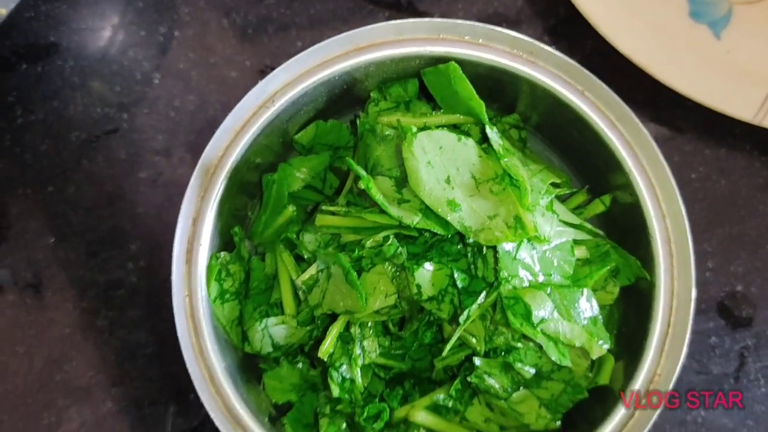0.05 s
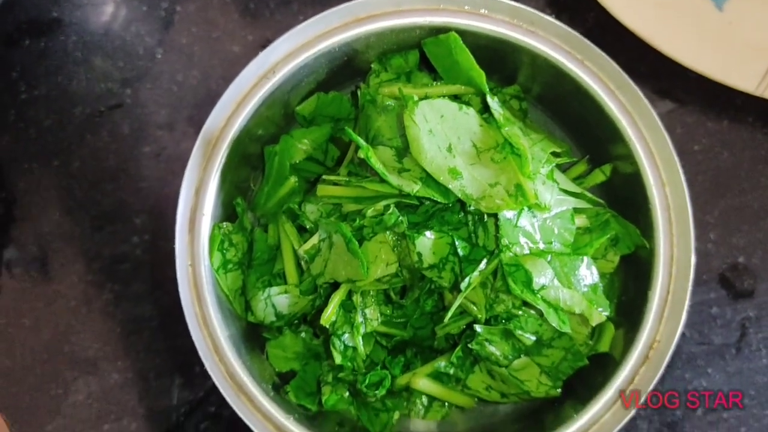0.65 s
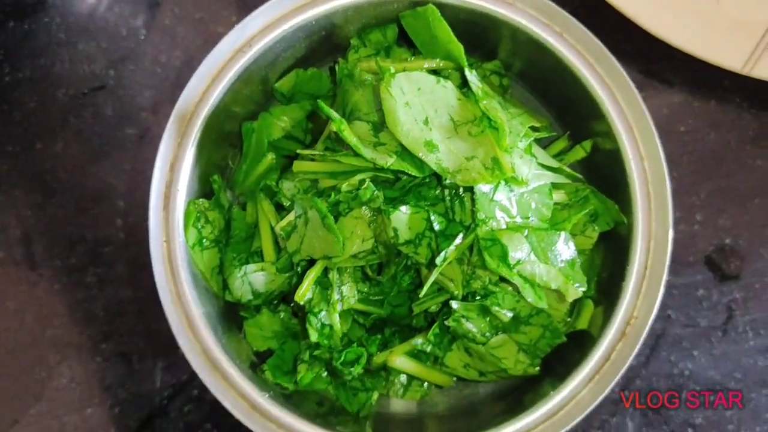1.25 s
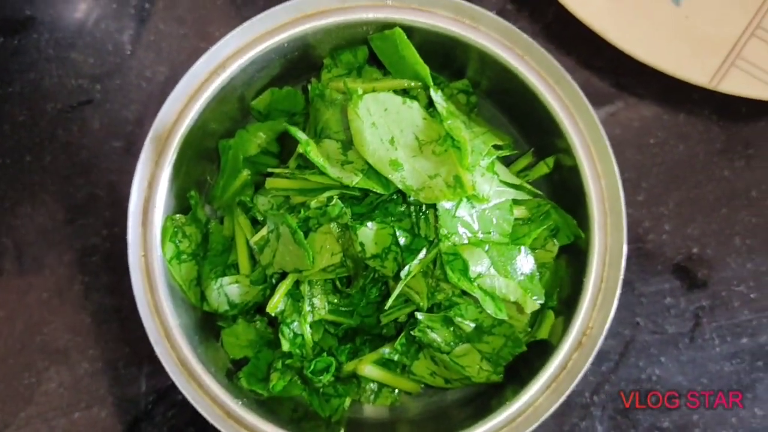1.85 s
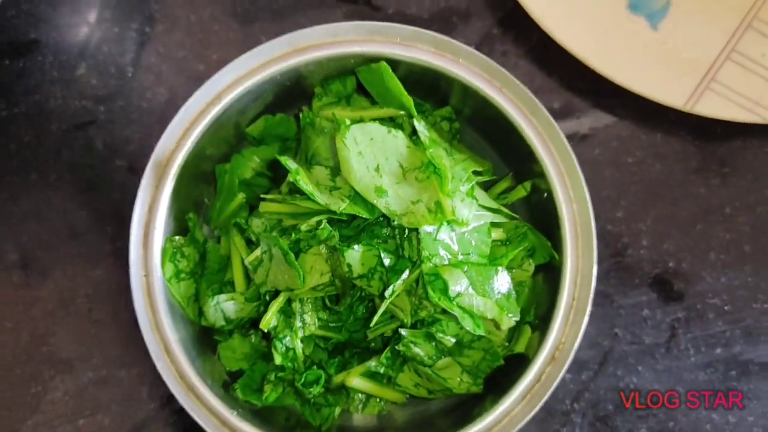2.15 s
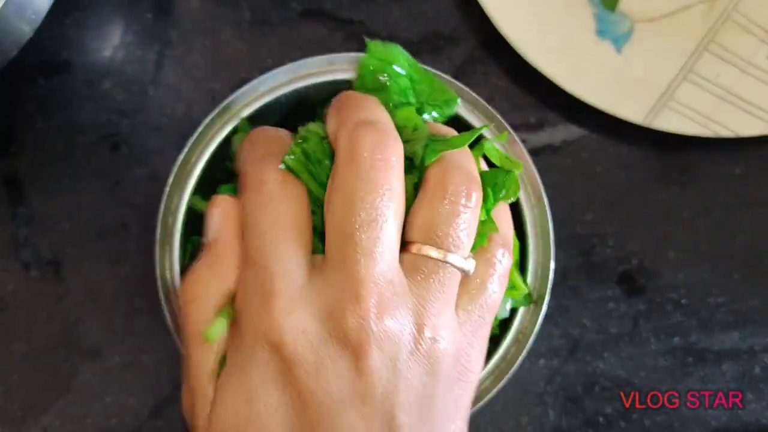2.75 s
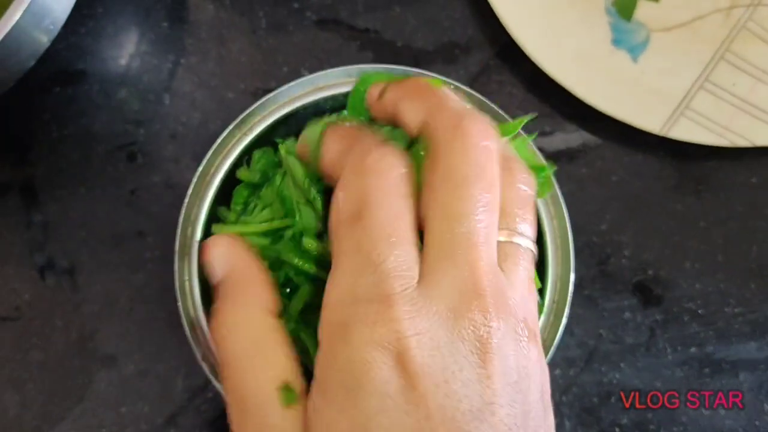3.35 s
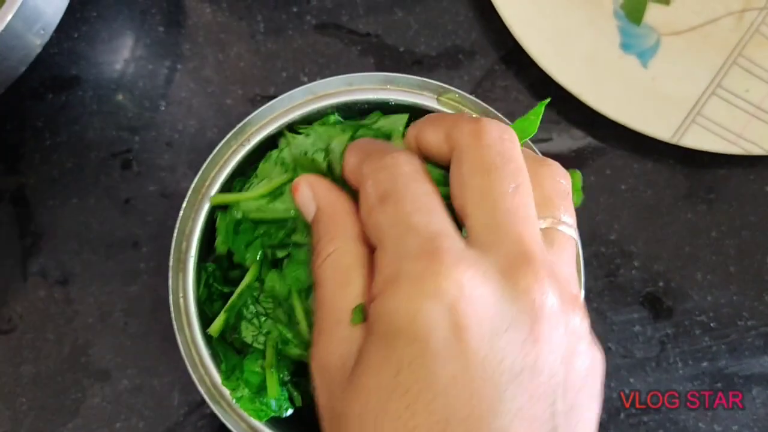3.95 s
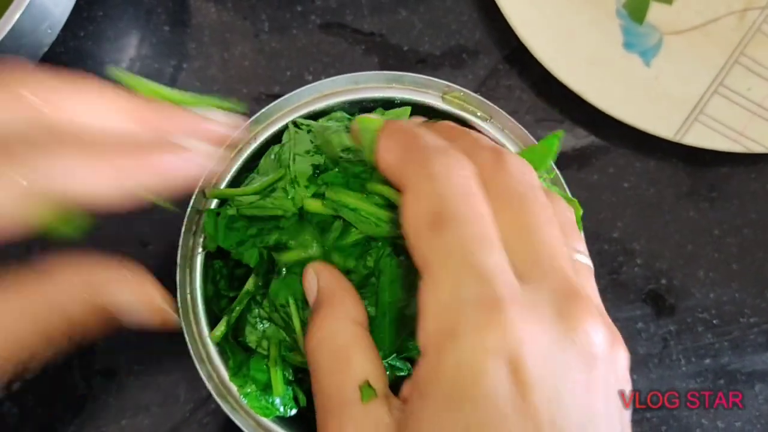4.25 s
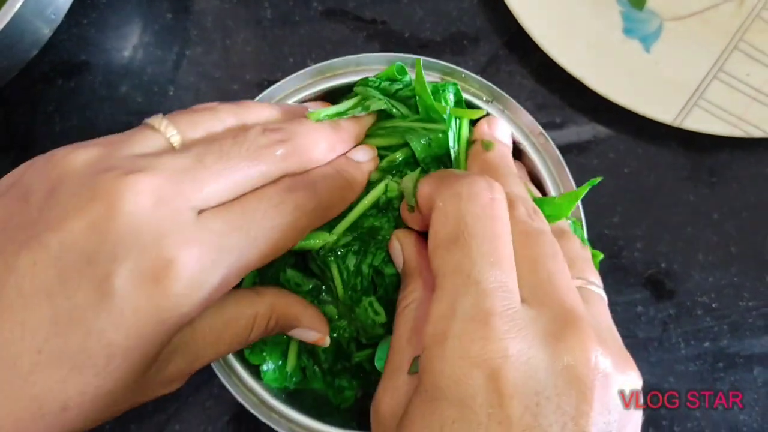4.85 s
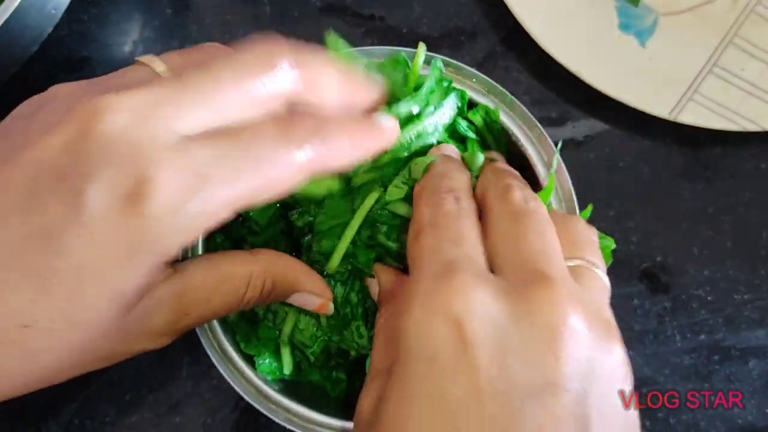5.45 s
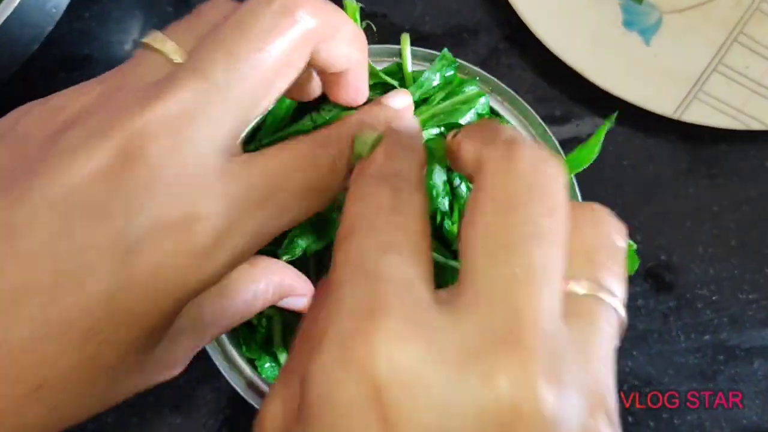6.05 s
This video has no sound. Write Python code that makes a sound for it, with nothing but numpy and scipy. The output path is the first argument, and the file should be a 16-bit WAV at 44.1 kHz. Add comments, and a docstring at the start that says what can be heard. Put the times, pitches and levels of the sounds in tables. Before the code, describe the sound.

Close, wet crackling and dripping of greens squeezed by hand, followed by a soft rustle and light pats in a metal bowl.

```python
"""Wet spinach, wrung out by hand close to a phone's two microphone ports in a small tiled kitchen.
Water films and stalks snap, juice fizzes through the leaves, and drops ring with trapped bubbles.
The leaves then rustle into a steel bowl and are patted down, with faint squeaks and dull knocks.
The tiles echo it all over a low hum; farther off, outside, a bird chirps faintly."""
import sys
import numpy as np
from scipy import signal
from scipy.fft import rfft, irfft
from scipy.io import wavfile
from scipy.ndimage import uniform_filter1d

SR = 44100
rng = np.random.default_rng(int(sys.argv[2]) if len(sys.argv) > 2 else 0)


def inscribe(sig):
    """Save sig as 16-bit PCM at rate SR to the path in sys.argv[1].

    A 1-D sig is mono; a 2-D sig holds one channel per row.
    Samples are clipped to [-1, 1] before scaling.
    """
    pcm = np.round(np.clip(np.atleast_2d(sig).T, -1, 1) * 32767)
    wavfile.write(sys.argv[1], SR, pcm.astype(np.int16))


N = 272979
T = np.arange(N) / SR
FREQS = np.maximum(np.fft.rfftfreq(N, 1 / SR), 1)

# Levels are at the source, ahead of the gains in scene(), the room and the microphone.
# films and stalks snapping: t/s, ping level/dB, f/Hz, then energy against the ping of
# splutter/dB, body/dB, crack/dB, and last splutter decay/s
LEAF_SNAPS = [(.02, -37.5, 7640, -2, 4, -20, .003), (.106, -38, 7400, -1, 8, -20, .003),
              (0.149, -25, 6500, 3, 3, -14, 0.0023), (.169, -38, 8000, -2, -15, -2, .001),
              (0.184, -23, 7000, 5, -2, -20, 0.0029), (.2105, -32, 6600, -5, 8, -20, .003),
              (0.238, -16, 8070, -2, -28, -27, .0015), (.257, -26.5, 5150, -12, -1, -19, .001),
              (0.3805, -29, 7400, 3, -8, -6, .001), (0.398, -35, 7460, -3, -19, -12, .002),
              (0.462, -25.5, 7200, -15, -4, -22, .0012), (.468, -30, 7700, -11, 4, -10, .001),
              (.505, -34, 7400, 3, 4, -6, 0.0044), (0.518, -30, 6960, -8, -7, -2, .002),
              (.549, -28, 7000, -8, -8, -13, .001), (.58, -32, 7000, -3, -10, -20, .002),
              (0.5928, -30, 6750, -8, -11, -15, .001), (0.6344, -28.5, 7400, -2, 4, -15, .001),
              (0.641, -29.5, 7400, -4, 6.5, -9, .005), (0.6853, -24, 7900, 8, -22, 2, .0016),
              (0.734, -32, 7900, 2, -16, -3, 0.0029), (0.8244, -8, 7130, -25, -12, -23, .001),
              (.8433, -39, 7500, -12, -18, -20, .001), (0.8528, -10.5, 7440, -19, -16, -35, 0.00082),
              (.984, -36, 7900, -10, -13, -12, .002), (1.018, -37, 7400, -1, -2, -10, .001),
              (1.03, -35.5, 7000, -14, 4, -13, 0.00092), (1.071, -34, 7600, -10, -16, -12, .002),
              (1.083, -29, 6500, -4, -15, -11, 0.0022), (1.105, -25.5, 6460, -3, -19, -8, 0.0019),
              (1.1215, -28, 7600, 1.5, -4, -10, .003), (1.203, -26.5, 7440, -7, -16, -17, 0.0022),
              (1.349, -36.5, 7540, -4, -6, -20, .002), (1.4649, -38, 7200, -7, 8, -11, .002),
              (1.497, -33, 7800, 6, -4, -9, .002), (1.5212, -5, 7280, -5, -27, -16.5, 0.0014),
              (1.5393, -21, 7700, 1, -25, -22, .002), (1.573, -26, 7340, -7, -5, -20, .001),
              (1.5936, -23.5, 7400, 5, 0.5, -12, 0.00065), (1.6623, -21, 7170, 1.5, -28, -18, 0.003),
              (1.74, -31, 7300, 0, -13, -20, .002), (1.776, -31, 7500, -7, -11, -24, .002),
              (1.8229, -16.5, 7150, -21, -20, -8, 0.0007), (1.9454, -26, 7350, -4, -30, -25, .002),
              (1.95, -21, 7200, -11, -35, -29, 0.0011), (1.995, -29.5, 8450, -5, -19, -16, .002),
              (2.0166, -20.5, 7800, 6.5, -8, -15, .0007), (2.035, -24.5, 6900, -15, 4.5, -5, .002),
              (2.057, -29, 7400, -2, 3, -12, .002), (2.113, -35, 7400, 5, -2, -18, .003),
              (2.18, -33, 7000, 4, -12, -24, .002), (2.2224, -17, 7800, -3, -11.5, -14.5, .0012),
              (2.875, -37, 7600, 5, -15, -20, 0.0054), (2.953, -36.5, 7500, -4, -15, -20, .002),
              (3.082, -38.5, 6700, -6, -8, -20, .002), (3.207, -40.5, 7100, 1, 0, -20, .002),
              (3.43, -40, 7900, -2, 2, -10, 0.0048), (3.9875, -29, 7500, -3, -7.5, -13, .001),
              (4.0481, -26.5, 7400, -14, -20, -13, .001), (4.0722, -27.5, 7550, -4, -16, -19, 0.001),
              (4.775, -37, 7400, -10, -3, -23, .002), (4.895, -27.5, 7240, -2, -28, -29, .002),
              (4.9033, -30, 7300, -10, -25, -32, .002), (4.9104, -33, 7240, -10, -25, -25, .002),
              (5.303, -43, 7300, -6, -15, -20, .002), (5.3665, -42.5, 7500, -7, 1, 0, .002),
              (5.4867, -35, 7500, -16, -8, -16, .002), (5.573, -28.5, 8100, -6, -20, -10, .002),
              (5.588, -30, 7860, -10, -26, -7, 0.0018), (5.617, -35.5, 8400, 0, -17, -1, .002),
              (6.133, -41, 7700, 5.5, -20, -21, 0.0024)]
# drops and air pockets: t/s, level/dB, f/Hz, glide/octaves per 10 ms, relative splash level/dB
DROPS = [(.147, -43, 1720, 0, -8), (.21, -36.5, 2730, .05, -17), (.404, -41, 2130, 0, -12),
         (.461, -42, 1710, .05, -5), (0.504, -38.5, 1840, 0.071, -13), (0.518, -44, 1440, 0.15, 0),
         (.581, -40, 2070, .05, -6), (.603, -42.5, 885, 0.0086, -30), (.743, -43.5, 2230, .026, -17),
         (.71, -50, 1016, 0.011, -12), (.777, -43, 1295, 0, -4), (.814, -39, 2240, .11, -5),
         (0.8504, -22, 2800, 0.33, -15), (0.913, -34, 1920, 0.04, -15), (1.001, -37, 2210, 0.19, -21),
         (1.029, -32.5, 3190, 0.23, -24), (1.251, -35, 2530, 0.13, -11), (1.496, -39.5, 1710, 0.021, -4),
         (1.517, -39, 1700, 0, -4), (1.661, -37, 1700, 0.41, -0.5), (1.7758, -28.5, 1810, 0.0078, -10),
         (1.995, -34, 2450, 0.1, -14), (2.016, -36, 2370, 0.17, 0), (2.035, -27.5, 2194, 0.26, -27),
         (2.06, -35.5, 2410, 0.086, -5), (2.138, -39.5, 2220, 0.03, -17), (5.702, -36.5, 2420, 0.045, -27),
         (5.741, -48, 1327, 0.16, -12)]
# the hand wrings, then pats: t/s, length/s, fizz level/dB, squelch level/dB
HAND_GRIPS = [(0, 0.13, -56, -57), (0.136, 0.092, -48.5, -53), (0.265, 0.061, -51.5, -59.5),
              (0.354, 0.096, -50.5, -56), (0.47, 0.041, -46, -49.5), (0.547, 0.076, -48, -54),
              (0.612, 0.035, -46.5, -53.5), (0.674, 0.1, -53, -56.5), (0.774, 0.16, -59, -59),
              (0.97, 0.086, -59, -63.5), (1.067, 0.09, -55, -57.5), (1.186, 0.13, -65, -61),
              (1.517, 0.14, -54.5, -75), (1.687, 0.076, -54, -63), (1.835, 0.047, -60, -76),
              (2.034, 0.052, -49.5, -58.5), (2.096, 0.13, -53.5, -59.5), (2.228, 0.028, -62, -81),
              (3.116, 0.038, -60.5, -71), (3.767, 0.037, -67, -84), (4.066, 0.026, -62, -72),
              (4.873, 0.035, -63, -69), (5.577, 0.11, -58, -65), (5.645, 0.25, -65, -73)]
# spectra of fizzing juice, squeezed leaves and sliding leaves: f/Hz, level/dB
FIZZ_SPECTRUM = [(1800, -77), (3200, -12), (4800, 0), (5600, -0.5), (7600, 9), (8700, 5.5), (9600, -5.5),
                 (10800, -12.5), (13000, -12.5), (16000, -14.5)]
SQUELCH_SPECTRUM = [(200, -24), (500, -9), (1000, -4.5), (1400, -9.5), (1650, -4.5), (1950, -1.5),
                    (2400, 2), (3000, -3.5), (3900, 0), (5500, -26), (10000, -49)]
RUSTLE_SPECTRUM = [(200, -18), (500, -3), (1000, -3.5), (1800, -2), (2800, 3.5), (3600, -8), (4600, -8),
                   (6000, -10), (7200, 4), (8200, -4.5), (9500, -14), (11000, -24), (16000, -27)]
# fingers and stalks nudge the bowl: t/s, level/dB, f/Hz, width/Hz
BOWL_NUDGES = [(.402, -43.5, 2110, 1500), (.461, -42.5, 258, 450), (0.852, -37, 2100, 3000),
               (4.075, -54, 2300, 2000), (4.103, -59, 1900, 1500), (4.458, -50, 970, 500),
               (5.675, -52, 1900, 2500), (5.699, -51, 1780, 2000), (5.74, -44.5, 1220, 1400),
               (5.762, -50.5, 2300, 3200), (5.776, -53, 1600, 2000)]
# wet skin on stalks and rim: t/s, level/dB, f/Hz, length/s, waver/share of pitch
SKIN_SQUEAKS = [(3.046, -54.5, 4940, 0.0063, .03), (4.206, -64, 5700, 0.095, .07),
                (4.592, -56.5, 8840, .032, 0.03), (4.657, -61, 8600, .021, .025),
                (5.243, -67, 5270, .04, .005), (5.362, -67, 5250, .032, .007),
                (5.366, -64, 8500, .03, .005), (5.365, -65, 3110, 0.11, .003)]
# bird notes, a falling sweep then a held whistle: t/s, level/dB, whistle f/Hz, relative sweep level/dB
BIRD_NOTES = [(3.133, -73, 6480, 2), (3.28, -71, 6450, 1), (3.425, -71, 6280, 0), (3.575, -73.5, 6250, -3),
              (5.988, -71.5, 6480, -1), (6.135, -71, 6400, 0)]
# course of one note: t/s, pitch/ratio to the whistle, amplitude/0-1
NOTE_SHAPE = [(0, .87, 0), (.008, .83, .6), (.026, .69, .5), (.04, .58, .36), (.044, .9, .1),
              (.054, .96, .55), (.064, 1, 1), (.095, 1, .65), (.125, .99, 0)]
# ring time of the tiled room: f/Hz, T60/s
KITCHEN_T60 = [(500, 0.25), (2500, 0.35), (7000, 0.17), (14000, 0.23)]
# spectrum of the room noise: f/Hz, level/dB
AIR_SPECTRUM = [(20, 1.5), (40, -5), (85, -9.5), (125, -18), (170, -11), (300, -16.5), (500, -20.5),
                (900, -21), (2400, -30), (4400, -34), (7400, -30.5), (8800, -36), (9600, -35), (10500, -87),
                (16000, -76)]
# likeness of that noise at the two ports: f/Hz, correlation/0-1
AIR_CORRELATION = [(60, 0.68), (150, 0.95), (300, 0.57), (640, 0.43), (1400, 0.0064), (16000, .01)]
# unsteady bands of the hum: f/Hz, width/Hz, level/dB
HUM_BANDS = [(156.5, 11.4, -67), (197.8, 16.6, -67), (393.5, 8.9, -75.5), (505, 7.5, -77)]
# balance of the microphone ports: f/Hz, left minus right/dB
PORT_BALANCE = [(60, 4.5), (200, 6), (700, 4), (1400, 5), (2100, 8), (2800, 4.5), (4400, -2), (7500, -5),
                (15000, 7)]


def snaps(rise_s=0.00032, body_hz=3200, body_s=0.0049, crack_s=0.00052):
    """Close up, a film tears with a crack and a ping; smaller tears splutter and the leaf ticks."""
    out, t = np.zeros(N), T[:SR // 30]
    swell = (t / rise_s * np.exp(1 - t / rise_s)) ** 4
    for start, db, hz, splutter_db, body_db, crack_db, splutter_s in LEAF_SNAPS:
        noise = rng.standard_normal((3, len(t)))
        ping = swell * np.sin(2 * np.pi * hz * t)
        tears = noise[0] ** 3 * np.exp(-t / splutter_s) * (t > .0005)
        splutter = signal.fftconvolve(tears, ping)[:len(t)]
        body = band(noise[1] * np.exp(-t / body_s), body_hz, 5400)
        crack = resonate(noise[2] * np.exp(-t / crack_s), 10600, 5000)
        parts = [(splutter_db, splutter), (body_db, body), (crack_db, crack)]
        tearing = sum(undb(part_db) * part / np.linalg.norm(part) for part_db, part in parts)
        add(out, start, undb(db) * (ping + np.linalg.norm(ping) * tearing))
    return out


def drips(rise_s=0.00065, splash_s=0.0053):
    """A drop splashes; its trapped bubble rings and rises in pitch as it nears the surface."""
    out, t = np.zeros(N), T[:SR // 8]
    for start, db, hz, glide, splash_db in DROPS:
        t60 = 0.034 * (2000 / hz) ** 2.1  # large bubbles ring longer
        pitch = hz * 2 ** np.minimum(glide * t / .01, .5)
        bubble = np.exp(-np.log(1000) * t / t60) * tone(pitch)
        spray = band(rng.standard_normal(len(t)), 1.3 * hz, 0.81 * hz)
        splash = undb(splash_db) * unit(spray) * np.exp(-t / splash_s)
        add(out, start, undb(db) * (1 - np.exp(-t / rise_s)) * (bubble + splash))
    return out


def fizz(tick_db=-8, tick_hz=6800):
    """Pressed juice bursts tiny films in spurts, each size at its own pitch; larger ones tick."""
    films = sum(resonate(crackle(rate=98, spread_db=2) * spurts(), hz, 1400)
                for hz in np.geomspace(3800, 13500, num=9))
    ticks = resonate(crackle(rate=74, spread_db=4.5), tick_hz, 4500)
    bursts = unit(colour(unit(films) + undb(tick_db) * unit(ticks), FIZZ_SPECTRUM))
    return bursts * juice_flow([row[2] for row in HAND_GRIPS], seep_db=-68.5, floor_db=-74)


def squelch(decay_cycles=4, bubble_count=900):
    """Leaves crackle over each other while small bubbles pop between them."""
    bubbles, t = np.zeros(N), T[:SR // 60]
    for when, smallness, strength in rng.random((bubble_count, 3)):
        hz = 1200 * 3 ** smallness
        pop = np.exp(-t * hz / decay_cycles) * np.sin(2 * np.pi * hz * t * (1 + 6 * t))
        add(bubbles, when * N / SR, undb(10 * strength) * pop)
    leaves = unit(crackle(rate=2000, spread_db=4) * spurts())
    wet_mass = unit(colour(leaves + undb(-5) * unit(bubbles), SQUELCH_SPECTRUM))
    return wet_mass * juice_flow([row[3] for row in HAND_GRIPS], seep_db=-85, floor_db=-75)


def juice_flow(levels_db, seep_db, floor_db, attack_s=0.0036, release_s=0.036, build_db=3):
    """Gain of the flow: each grip sets in, builds and ebbs, over seeping that fades after the wring."""
    wring_end_s, settle_s = 2.48, 0.38
    power = (undb(seep_db) * np.exp(-np.maximum(T - wring_end_s, 0) / settle_s)) ** 2
    t = T[:SR // 2]
    attack = np.minimum(t / attack_s, 1)
    for (start, length, *_), db in zip(HAND_GRIPS, levels_db):
        build = undb(build_db * (np.minimum(t / length, 1) - 2))  # ends build_db below the grip's level
        release = np.exp(-np.maximum(t - length, 0) / release_s)
        add(power, start, (undb(db) * attack * build * release) ** 2)
    return np.hypot(np.sqrt(power), undb(floor_db))


def spurts(rate_hz=55, spread_db=4.5):
    """Gain of a wet layer that gives way in spurts, each of its own strength."""
    hold = int(SR / rate_hz)
    strengths = np.clip(rng.standard_normal(N // hold + 1), -2, 2)
    steps = np.roll(np.repeat(strengths, hold)[:N], rng.integers(N))
    return undb(spread_db * uniform_filter1d(steps, size=hold // 4))


def rustle(start_s=2.406, end_s=2.995, edge_s=0.063, end_db=-54.5, build_db=8):
    """The heap is laid in the bowl: countless slips of leaf on leaf swell until the hand stops."""
    progress = np.clip((T - start_s) / (end_s - start_s), 0, 1)
    contact = np.clip(np.minimum(T - start_s, end_s - T) / edge_s, 0, 1)
    slips = unit(colour(crackle(rate=9000, spread_db=2), RUSTLE_SPECTRUM))
    return slips * contact * undb(end_db + build_db * (progress - 1))


def nudges(decay_s=0.0031):
    """Dull, gritty knocks on the bowl; the wet heap damps the steel at once."""
    out, t = np.zeros(N), T[:SR // 20]
    for start, db, hz, width_hz in BOWL_NUDGES:
        grit = band(rng.standard_normal(len(t)) ** 3, hz, width_hz)
        add(out, start, undb(db) * unit(grit) * np.exp(-t / decay_s))
    return out


def squeaks():
    """A finger slips along a wet stalk or the rim and draws a thin tone, clean or hoarse."""
    out, t = np.zeros(N), T[:SR // 6]
    for start, db, hz, length, waver in SKIN_SQUEAKS:
        pitch = hz * (1 + waver * jitter(len(t), smooth_samples=40))
        envelope = np.sin(np.pi * np.minimum(t / length, 1))
        add(out, start, undb(db) * envelope * unit(tone(pitch)))
    return out


def bird(waver=0.023, rasp=0.14, sweep_s=.044):
    """A thin whistle from outside, hoarse in its fall and nearly steady on the held note."""
    out, t = np.zeros(N), T[:SR // 7]
    when, ratio, amplitude = np.transpose(NOTE_SHAPE)
    course = np.interp(t, when, ratio)
    for start, db, hz, sweep_db in BIRD_NOTES:
        wobble = 1 + (waver + rasp * (1 - course)) * jitter(len(t), smooth_samples=60)
        envelope = np.interp(t, when, amplitude * undb(db + sweep_db * (when < sweep_s)))
        add(out, start, envelope * tone(hz * course * wobble))
    return out


def kitchen(x, near_db, near_s, room_db, lag_s, positions=1):
    """At the two ports: direct sound, nearby reflections and the tail of the tiled room."""
    t = T[:SR // 2]
    f = np.maximum(np.fft.rfftfreq(len(t), 1 / SR), 1)
    noise = rfft(rng.standard_normal((2, len(t))))
    tail = 0
    for hz, t60 in KITCHEN_T60:
        share = by_pitch([(centre, centre == hz) for centre, _ in KITCHEN_T60], f)
        tail = tail + irfft(noise * share, len(t)) * np.exp(-np.log(1000) * t / t60)
    onset = 1 - np.exp(-t / 0.00089)
    tail = flatten(tail * onset) * (1 - t / t[-1])
    response = undb(room_db) * tail / np.linalg.norm(tail, axis=1, keepdims=True)
    response[1, 0] += 1
    response[0, int(lag_s * SR)] += undb(-20)  # the left port faces away: later and weaker
    direct_and_tail = signal.fftconvolve(x[None], response, axes=1)[:, :N]
    return direct_and_tail + undb(near_db) * near_reflections(x, near_s, positions)


def near_reflections(x, decay_s, positions, passes=4):
    """Quick echoes off hands, bowl and counter, different for each position of the hands."""
    out, step, t = np.zeros((2, N)), N // positions + 1, T[:1024]
    fade = np.exp(-t / decay_s) * (t > .0006)
    for start in range(0, N, step):
        echo = rng.standard_normal((2, len(t))) * fade
        for _ in range(passes):  # even out the colour, keeping the echo short
            echo = irfft(np.exp(1j * np.angle(rfft(echo))), len(t)) * fade ** (1 / passes)
        echo /= np.linalg.norm(echo, axis=1, keepdims=True)
        add(out, start / SR, signal.fftconvolve(x[None, start:start + step], echo, axes=1))
    return out


def room_tone(air_db=-52.5, motor_hz=154.7, motor_db=-65.5, hiss_hz=7350, hiss_db=-70):
    """Low room noise and a wavering hum with a steady core; hiss rings in the microphone ports."""
    mid, side, hum = rng.standard_normal((3, N))
    likeness = by_pitch(AIR_CORRELATION)
    common = rfft(mid) * np.sqrt(1 + likeness)
    opposed = np.array([[1], [-1]]) * rfft(side) * np.sqrt(1 - likeness)
    air = unit(irfft((common + opposed) * undb(by_pitch(AIR_SPECTRUM)), N))
    drone = sum(undb(db) * unit(resonate(resonate(hum, hz, width), hz, 2 * width))
                for hz, width, db in HUM_BANDS)
    port_ring = resonate(rng.standard_normal((2, N)), hiss_hz, 550)
    hiss = unit(resonate(port_ring, hiss_hz, 6000))
    motor = unit(np.sin(2 * np.pi * motor_hz * T))
    return undb(air_db) * air + drone + undb(motor_db) * motor + undb(hiss_db) * hiss


def crackle(rate, spread_db):
    """Random clicks, about rate a second, most small and a few large."""
    size = undb(spread_db * np.minimum(rng.exponential(size=N), 4))
    return unit((rng.random(N) < rate / SR) * size * rng.choice([-1, 1], N))


def jitter(n, smooth_samples):
    """Smoothed noise at rms 1."""
    return unit(uniform_filter1d(rng.standard_normal(n), size=smooth_samples))


def tone(pitch_hz):
    """A sine that follows a pitch curve."""
    return np.sin(2 * np.pi * np.cumsum(pitch_hz) / SR)


def resonate(x, hz, width_hz):
    """One resonance, gain 1 at its centre."""
    return signal.lfilter(*signal.iirpeak(hz, hz / width_hz, fs=SR), x)


def band(x, hz, width_hz):
    """The same resonance twice, for steeper skirts."""
    return resonate(resonate(x, hz, width_hz), hz, width_hz)


def colour(x, rows):
    """Causal filter with the outline f/Hz, level/dB."""
    cepstrum = irfft(np.log(undb(by_pitch(rows))), N)
    cepstrum[1:N // 2] *= 2
    cepstrum[N // 2:] = 0
    return irfft(rfft(x) * np.exp(rfft(cepstrum)), N)


def flatten(echo):
    """Smooth the broad peaks and dips out of a diffuse echo."""
    spectrum = rfft(echo)
    outline = np.sqrt(uniform_filter1d(np.abs(spectrum) ** 2, size=100))
    return irfft(spectrum / outline, echo.shape[-1])


def by_pitch(rows, hz=FREQS):
    """Read rows of f/Hz, value on a log-frequency axis."""
    f, value = np.transpose(rows)
    return np.interp(np.log(hz), np.log(f), value)


def add(track, start_s, x):
    """Mix x into the track at a time."""
    i = int(start_s * SR)
    x = x[..., :max(N - i, 0)]
    track[..., i:i + x.shape[-1]] += x


def undb(db):
    """Decibels to gain."""
    return 10 ** (np.asarray(db) / 20)


def unit(x):
    """Scale to rms 1."""
    return x / np.sqrt(np.mean(x ** 2))


def scene():
    """Hands and bowl are close to the microphone; the distant bird arrives mostly as room echo."""
    mix = kitchen(snaps(), near_db=-8.5, near_s=0.002, room_db=-7, lag_s=0.00028, positions=40)
    mix += kitchen(drips() + squeaks(), near_db=-2, near_s=0.0033, room_db=-3.5, lag_s=.0001)
    juice = undb(5) * fizz()
    mix += kitchen(juice, near_db=-0.5, near_s=0.0032, room_db=-1.5, lag_s=0.00019, positions=70)
    handling = undb(6) * (squelch() + nudges())
    mix += kitchen(handling, near_db=-1.5, near_s=0.0043, room_db=-2, lag_s=0.00113, positions=70)
    mix += kitchen(rustle(), near_db=1, near_s=0.0043, room_db=-3, lag_s=0.0004, positions=40)
    mix += kitchen(bird(), near_db=10, near_s=0.0024, room_db=20.5, lag_s=.0001)
    return mix + room_tone()


def record(dry):
    """The phone's two ports colour the sound differently; the top is cut above 16.2 kHz."""
    tilt_db = by_pitch(PORT_BALANCE) * np.array([[.5], [-.5]])
    heard = irfft(rfft(dry) * undb(tilt_db), N)
    return signal.sosfilt(signal.ellip(8, .2, 70, 16200, fs=SR, output="sos"), heard)


dry = scene()
out = record(dry)
inscribe(out)
```